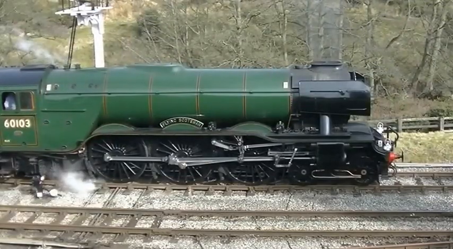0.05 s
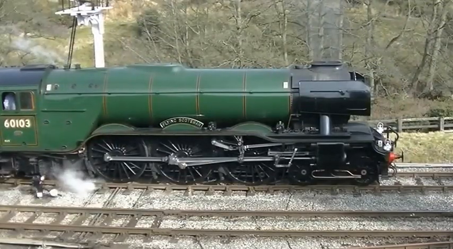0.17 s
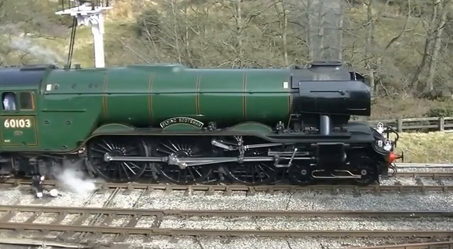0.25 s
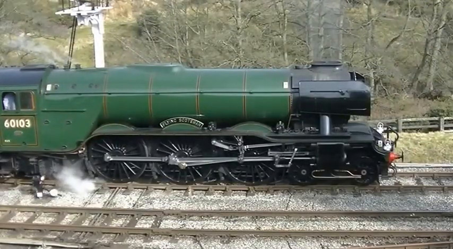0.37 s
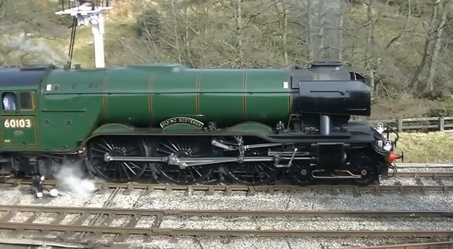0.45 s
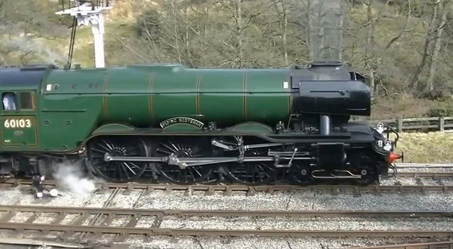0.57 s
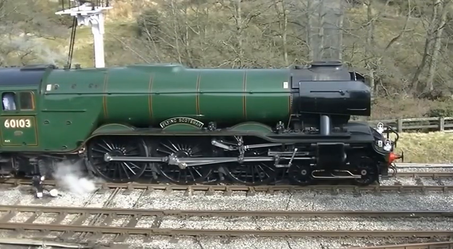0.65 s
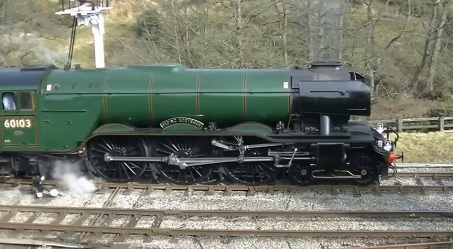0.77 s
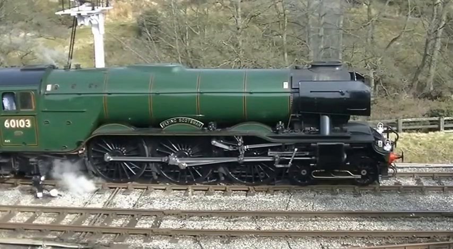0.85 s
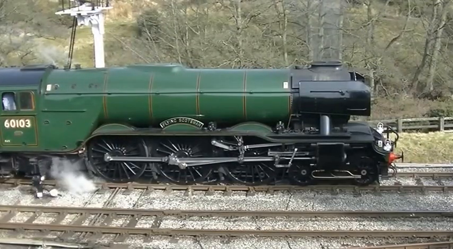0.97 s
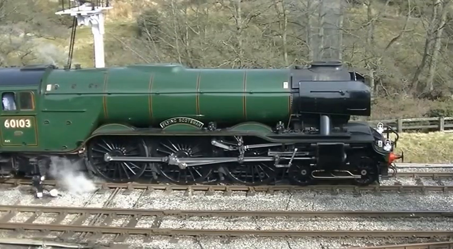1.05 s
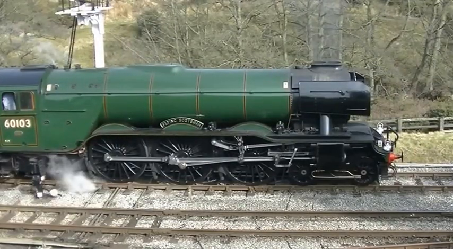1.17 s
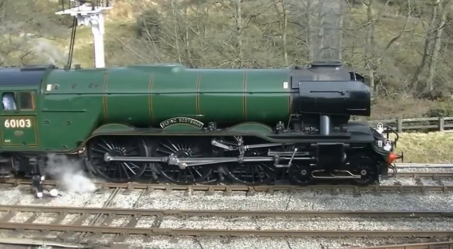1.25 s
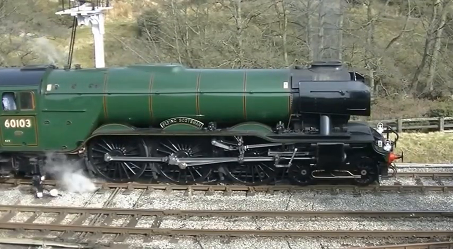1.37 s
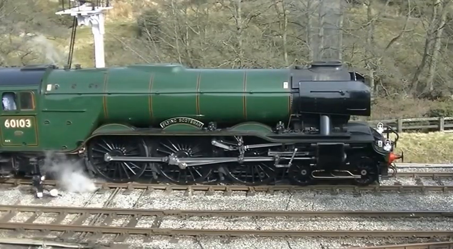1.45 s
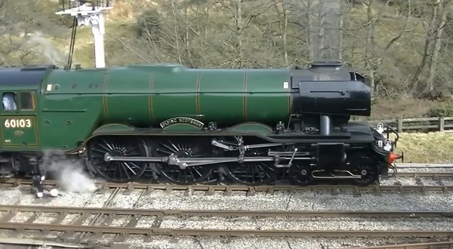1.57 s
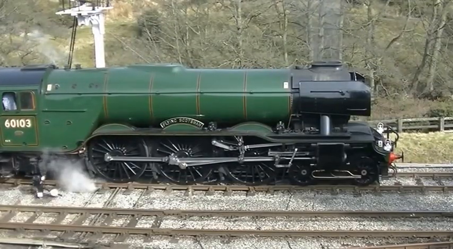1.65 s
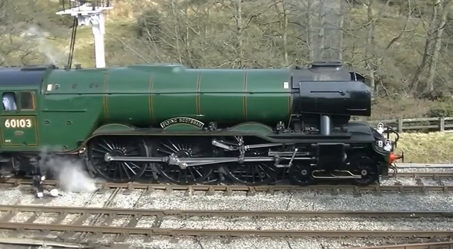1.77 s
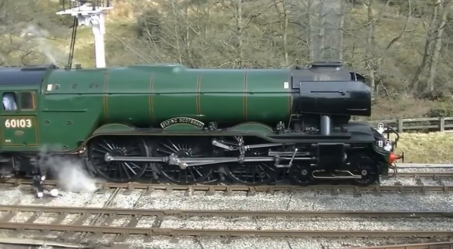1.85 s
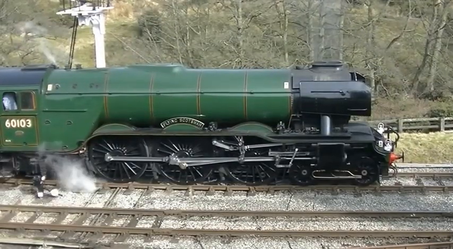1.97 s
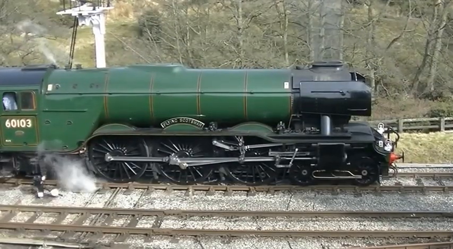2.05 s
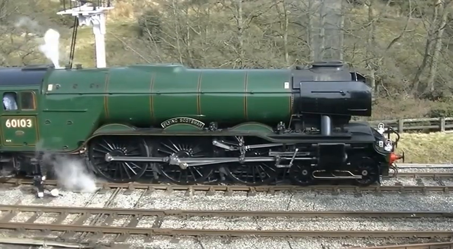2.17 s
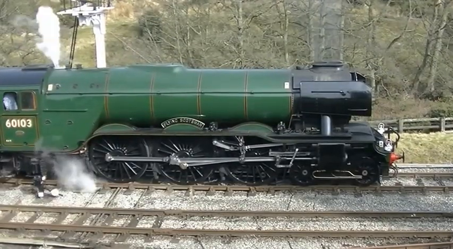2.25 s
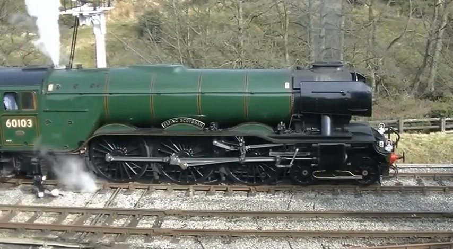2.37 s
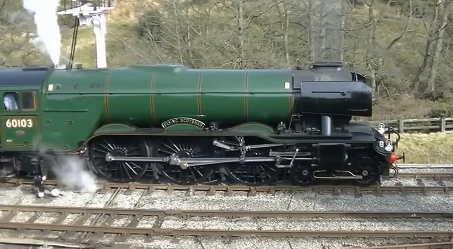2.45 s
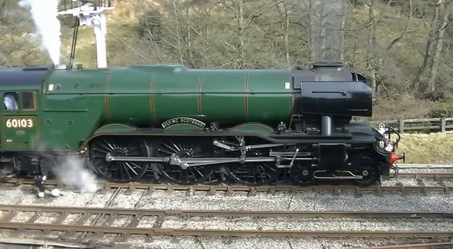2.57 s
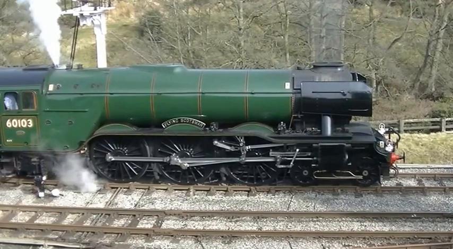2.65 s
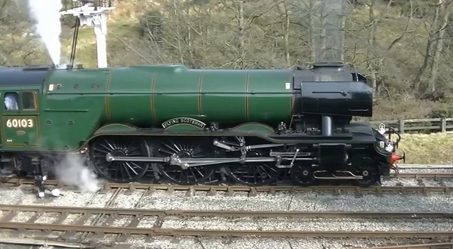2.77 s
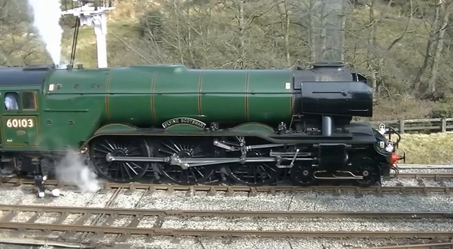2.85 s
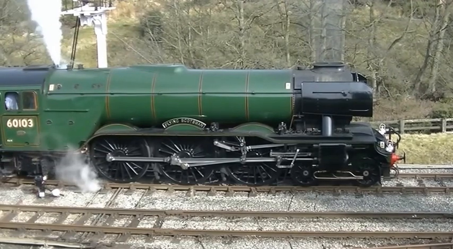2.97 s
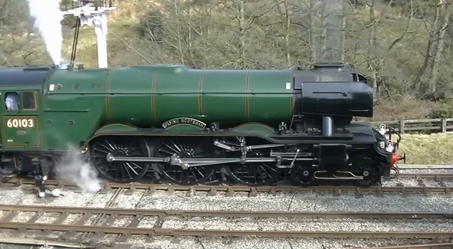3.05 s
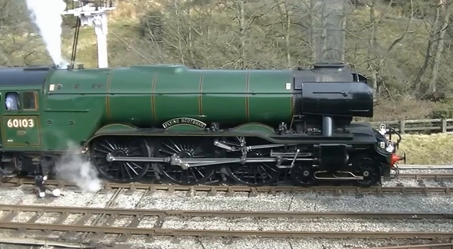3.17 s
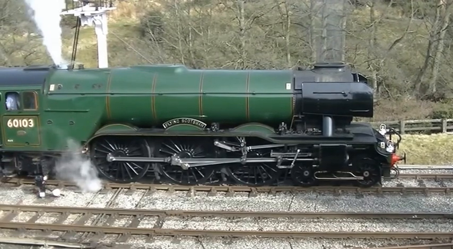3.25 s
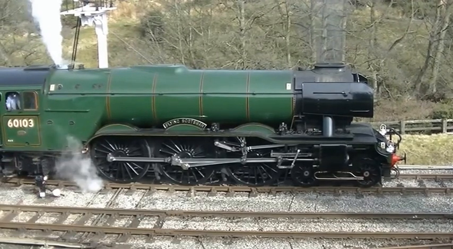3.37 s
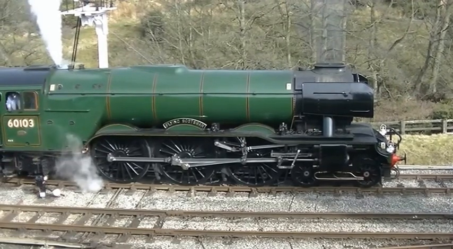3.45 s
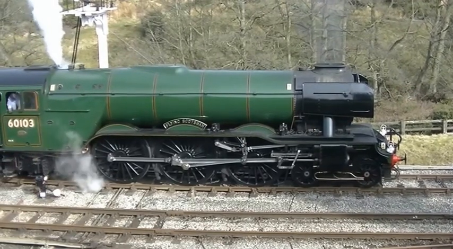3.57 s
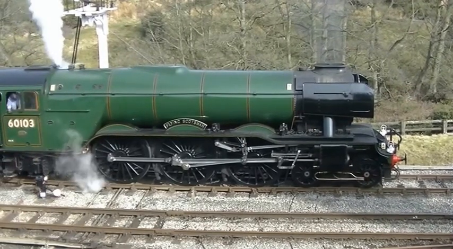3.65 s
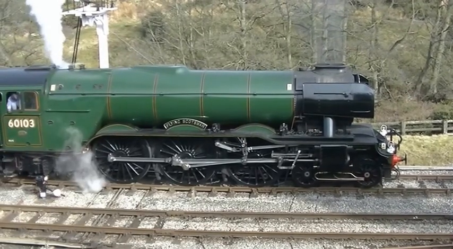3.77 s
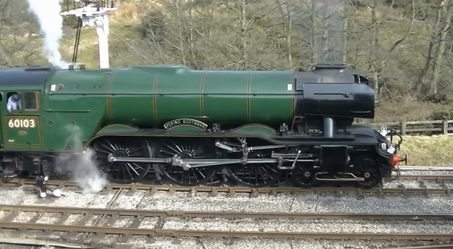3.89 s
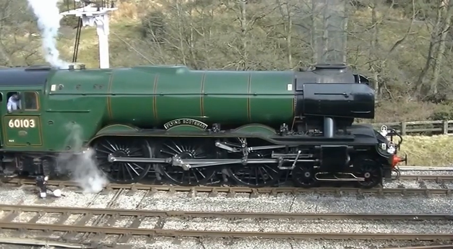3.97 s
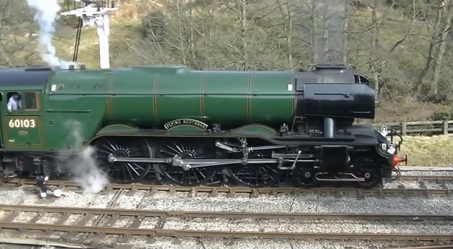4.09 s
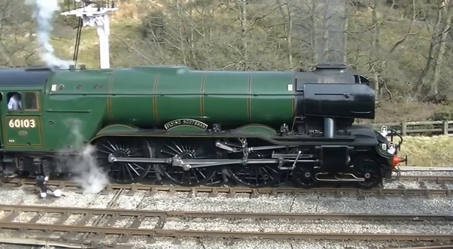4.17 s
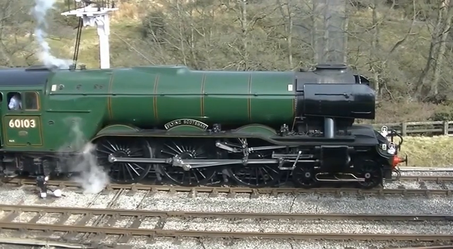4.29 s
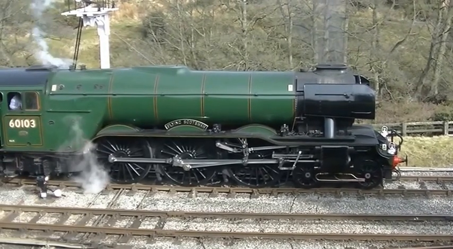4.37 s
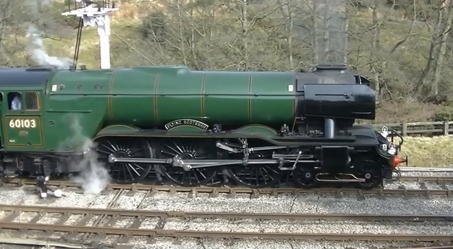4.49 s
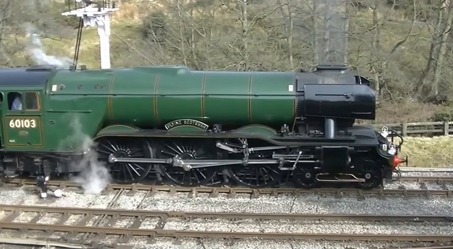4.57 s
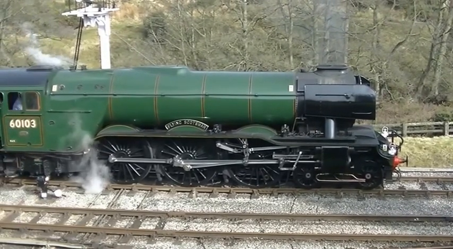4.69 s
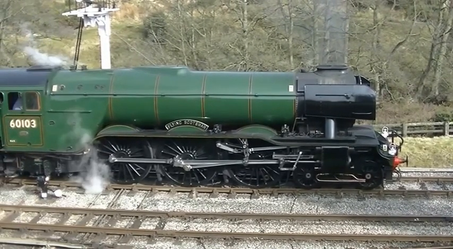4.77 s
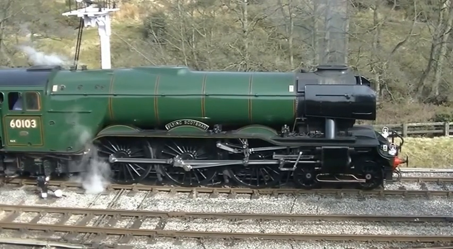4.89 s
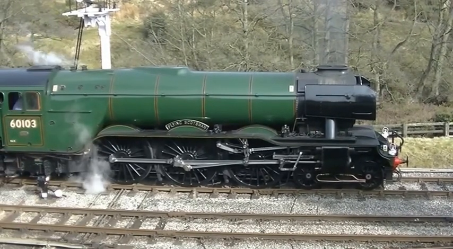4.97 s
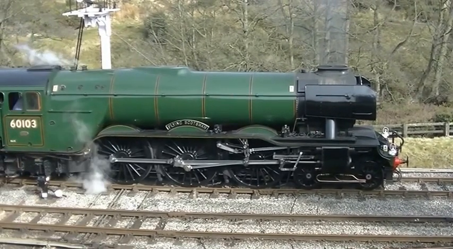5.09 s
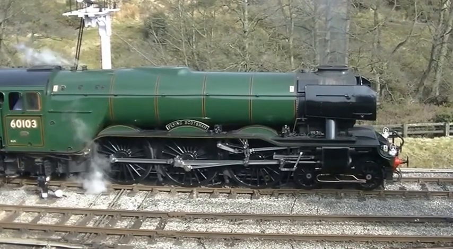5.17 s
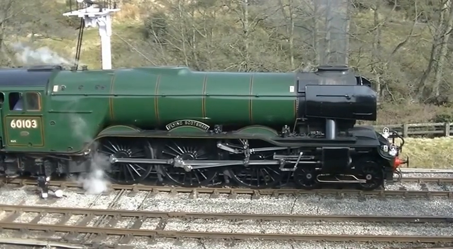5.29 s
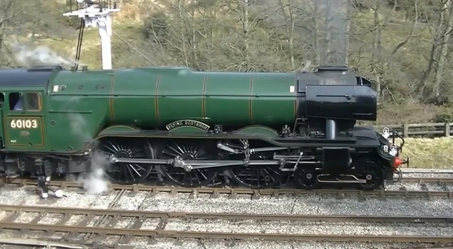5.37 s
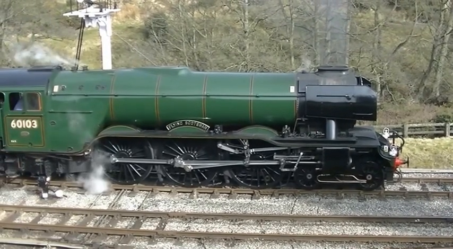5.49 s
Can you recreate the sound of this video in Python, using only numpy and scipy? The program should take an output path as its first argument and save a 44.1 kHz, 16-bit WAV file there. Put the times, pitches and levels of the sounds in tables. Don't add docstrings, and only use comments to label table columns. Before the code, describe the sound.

Outdoors beside a railway, continuous escaping steam with a slightly pipe-like, wavering colour. Midway, a very high single whistle note breaks in with a wet stutter, slides up to pitch and holds, trembling slightly, with breathy steam around it. It ends abruptly; a dull smear and three weak echoes follow while the hiss swells back. A faint bright steam puff comes later. Camera microphone, stereo, automatic level.

```python
import sys
import numpy as np
from scipy import signal
from scipy.fft import rfft, irfft
from scipy.io import wavfile
from scipy.ndimage import uniform_filter1d

SR = 44100
rng = np.random.default_rng(int(sys.argv[2]) if len(sys.argv) > 2 else 0)


def natural_amplitude(level_db):
    exponent = np.asarray(level_db, float) / 20
    return 10 ** exponent


def to_wav(sig):
    pcm = np.clip(np.atleast_2d(sig), -1, 1) * 32767
    pcm = np.round(pcm).astype(np.int16)
    wavfile.write(sys.argv[1], SR, pcm.T)


N = 243873
LONG = 2 ** 18

# (time [s], tone level [dB], left over right [dB])
NOTE = [
    (2.345, -37, 2),
    (2.365, -22, -2),
    (2.42, -13.5, -9.5),
    (2.47, -9.5, 5),
    (2.62, -8.5, -3),
    (2.8, -7, 1.5),
    (3.3, -8.5, 2),
    (3.89, -12, 0),
    (3.931, -15.5, 2),
]


def whistle():
    # (multiple of the note, level under the tone [dB], left over right [dB], extra level while cold [dB])
    overtones = [
        (2, -29.5, 14.5, -3),
        (3, -29.5, -5, -19),
        (5, -53, 0, -7),
    ]
    leads_rad, flickers_db = (4.3, 0, .6), (4.5, 2.6, 2.5)
    # (time [s], level [dB], half width [s])
    falters = [
        (2.352, -7.5, .006),
        (2.365, -20, 0.00094),
        (2.401, -7.5, 0.0035),
        (2.44, -4, 0.0054),
        (2.463, -8, 0.0036),
        (3.871, -7.5, 0.0032),
        (3.878, -10, 0.0026),
        (3.917, -10, 0.004),
    ]
    warm_hz, cold_hz, warm_s = 3041.6, 134.2, .45
    catch_hz, catch_s = 190, .025
    shut_s, shut_sag_hz = .012, 170
    bloom_s = .2

    t = np.arange(N) / SR
    start, end = NOTE[0][0], NOTE[-1][0]
    since = np.maximum(t - start, 0)
    shut = np.clip((t - end) / shut_s, 0, 1)
    on = np.clip(np.minimum(since, end + shut_s - t) / 0.0065, 0, 1)
    falter_db = sum(db * np.exp(-((t - s) / w) ** 2) for s, db, w in falters)

    hz = warm_hz - cold_hz * np.exp(-since / warm_s)
    hz = hz - catch_hz * np.exp(-since / catch_s) - shut_sag_hz * shut
    hz = hz + 7.6 * drift(0.0044) + 2.61 * drift(0.0207)
    turn = 2 * np.pi * np.cumsum(hz) / SR

    side = np.array([[.5], [-.5]])
    tone_db = steam_db() + curve(NOTE, column=2) * side + 0.52 * drift(0.0057)
    tone = np.cos(turn - 0.19 * side) * natural_amplitude(tone_db)
    for (multiple, db, left_db, cold_db), lead, flicker_db in zip(overtones, leads_rad, flickers_db):
        level_db = steam_db() + db + cold_db * np.exp(-since / bloom_s)
        level_db = level_db + left_db * side + flicker_db * drift(0.016)
        tone = tone + np.cos(round(multiple) * turn + lead * side) * natural_amplitude(level_db)
    return np.sqrt(2) * on * natural_amplitude(falter_db) * tone


def steam_db():
    shut_db_per_s = 900
    t = np.arange(N) / SR
    outside = np.maximum(np.maximum(NOTE[0][0] - t, t - NOTE[-1][0]), 0)
    return np.maximum(curve(NOTE, column=1) - shut_db_per_s * outside, -120)


def valve(hz):
    # (frequency [Hz], level [dB])
    jet_colour = [(300, -44), (1000, -16), (3000, -6.5), (6000, -6), (9000, 0.5), (10500, -8.5),
                  (11500, -14.5), (13000, -13.5), (15700, -20)]
    # (frequency [Hz], width [Hz], level [dB])
    bell = [(646, 250, -43), (1148, 178, -30), (1940, 160, -41), (2720, 150, -27.5), (3063, 304, -22.5),
            (3880, 570, -34), (4970, 240, -30), (6210, 560, -37), (7050, 250, -48), (7860, 92, -37.5),
            (8760, 570, -43.5), (9870, 900, -45)]
    # (frequency [Hz], likeness [0-1], left over right [dB], phase the left leads by [rad])
    high_place = [(400, 0.97, -1, 0.5), (2500, .998, 1, 0), (3000, 1, 2, 1.5), (3600, 0.83, -1, -0.5),
                  (5230, 0.95, 1, 1), (5670, 0.67, 1.5, 4), (6220, 0.68, 5.5, 2), (7240, 0.55, 2.5, -1.5),
                  (7660, 0.97, -1, -0.5), (10300, 0.95, -3, 0.5), (11200, .25, -7, -3), (12000, .6, -2, 1),
                  (14200, .6, 0, -5)]
    breath_db, spill_db = -15.5, -31.5

    jet = turbulence(natural_amplitude(read(jet_colour, hz)), 1.2, 0.92, high_place)
    low_cut = 1 / (1 + (450 / (hz + 1)) ** 4)
    breath = turbulence(low_cut * peaks(bell, hz, steep=1.59), 0.94, 0.43, high_place)
    spill = natural_amplitude(steam_db() + spill_db + 1.2 * drift(.05))
    breath_level = natural_amplitude(steam_db() + breath_db + 0.52 * drift(0.052))
    return (puffs() + spill) * jet + breath_level * breath


def puffs():
    # (start [s], rise [s], peak level [dB], fall [dB per s], settling level [dB])
    puff_times = [
        (2.17, 0.2, -39.5, 300, -90),
        (2.62, .08, -38, 111, -91),
        (3.36, 0.23, -32.5, 130, -90),
        (4.52, 0.16, -41.5, 40, -51),
    ]
    t, level = np.arange(N) / SR, 0
    for start, rise, peak_db, fall_db, rest_db in puff_times:
        swell = np.clip((t - start) / rise, 0, 1) ** 0.94
        sinking_db = peak_db - fall_db * np.maximum(t - start - rise, 0)
        level = level + swell * natural_amplitude(np.maximum(sinking_db, rest_db))
    return level


def leak(hz):
    # (frequency [Hz], level [dB per Hz])
    hiss = [(30, -63), (180, -64.5), (400, -38.5), (600, -24), (900, -28.5), (1100, -11.5), (2000, -12.5),
            (2500, -18.5), (3100, -12), (4500, -8.5), (5800, -12.5), (7300, -25), (11500, -35),
            (15700, -46)]
    # (frequency [Hz], width [Hz], level
    # [dB])
    pipes = [(226.6, 33, -32.5), (310, 33, -39), (373, 39, -31.5), (452.4, 31, -21.5), (514, 67, -18.5),
             (666, 27.5, -6), (728, 44, -10), (775.5, 28, -7), (865, 17, -13), (1008.4, 103, -4.5),
             (1190, 58, -10), (1287, 46, -5), (1429, 83, -5), (1550, 31, -6), (1652, 76, -3),
             (1723, 37, -7.5), (1925, 86, -2.5), (2033, 60, -7.5), (2128, 51, -7), (2343, 150, -12),
             (2718, 83, -5.5), (2855, 90, -0.5),
             (3418, 103, -2.5), (3830, 183, 2), (4147, 54, -1.5), (5030, 44, -27), (4980, 110, -0.5),
               (5288, 156, -1.5), (6333, 54, -10), (6655, 220, -17.5), (7640, 184, -16.5),
               (9370, 230, -27.5), (10340, 880, -32), (12600, 900, -32.5)]
    # (frequency [Hz], likeness [0-1], left over right [dB], phase the left leads by [rad])
    low_place = [(60, .7, 2, 3), (300, 1, -3, 0), (1200, 0.99, -1.3, 0), (2400, 0.96, -2, 0),
                 (3080, 0.93, -4, 0), (3700, 1, -3.5, 0.57), (5560, 0.98, -1, .5), (6130, 0.7, 1.5, 1.93),
                 (6310, 0.9, 8, 0.1), (7550, 0.8, 5, -1.5), (8500, 0.5, 1, -0.5), (10500, .7, -9.5, -1.1),
                 (11400, .2, -4, 3), (12600, .7, 0.5, -3.5), (14000, .25, -2.5, 3.5)]
    colour = np.hypot(natural_amplitude(read(hiss, hz)), peaks(pipes, hz, steep=1.97))
    return natural_amplitude(-28) * turbulence(colour, 1.53, 0.93, low_place)


def hillside(x):
    # (delay [s], level [dB])
    banks = [
        (0.199, -30.5),
        (.31, -29.5),
        (.435, -29),
    ]
    near_s, far_s = .03, .45
    hill_db, fall_db_per_s, beyond_db = -34.5, 25, -7
    delay = np.arange(SR) / SR
    db = hill_db - fall_db_per_s * delay + beyond_db * (delay > far_s)
    onset = np.minimum(delay / near_s, 1) ** 3
    taps = onset * natural_amplitude(db - 31.0) * rng.standard_normal((2, SR))
    for s, echo_db in banks:
        taps[:, round(s * SR)] += natural_amplitude(echo_db)
    taps = signal.lfilter(*signal.butter(1, 5500, fs=SR), taps + 0.32 * taps[::-1])
    return signal.fftconvolve(x, taps, axes=1)[:, :N]


def turbulence(colour, patchy_db, gust_db, place):
    hop, frame = 256, 1024
    frames, hz = N // hop + 6, np.fft.rfftfreq(frame, 1 / SR)
    a, b, c, d, patches, strands = rng.standard_normal((frames, len(hz), 6)).T
    strands = evened(uniform_filter1d(uniform_filter1d(strands, size=5, axis=0), size=24, axis=1))
    patches = evened(uniform_filter1d(uniform_filter1d(patches, size=14, axis=0), size=10, axis=1))
    gusts = evened(uniform_filter1d(rng.standard_normal(frames), size=5))

    same, lean_db, lead = (read(place, hz, column=k)[:, None] for k in (1, 2, 3))
    same = np.clip(same, 0, 1)
    left = a + 1j * b
    right = (same * left + np.sqrt(1 - same ** 2) * (c + 1j * d)) * np.exp(-1j * lead)
    ports = np.array([left * natural_amplitude(lean_db / 2), right * natural_amplitude(-lean_db / 2)])
    ports = ports * natural_amplitude(patchy_db * (patches + 0.68 * strands) + gust_db * gusts)
    white = signal.istft(ports, nperseg=frame, noverlap=frame - hop)[1][:, :N]
    return evened(irfft(rfft(white, LONG) * colour, LONG)[:, :N])


def peaks(modes, hz, steep):
    return np.sqrt(sum(natural_amplitude(2 * db) / (1 + (2 * (hz - f) / w) ** 2) ** steep for f, w, db in modes))


def drift(seconds):
    size = max(round(seconds * SR), 1)
    return evened(uniform_filter1d(uniform_filter1d(rng.standard_normal(N), size), size))


def evened(x):
    return x / np.sqrt(np.mean(abs(x) ** 2) + 1e-20)


def read(points, hz, column=1):
    points = np.array(points)
    return np.interp(np.log(hz + 1), np.log(points[:, 0] + 1), points[:, column])


def curve(rows, column):
    rows = np.array(rows)
    return np.interp(np.arange(N) / SR, rows[:, 0], rows[:, column])


def gain_control(x):
    knee_db, squeeze, memory = -26, 0.78, 0.54
    grab_s, let_go_s, memory_s = 0.0023, .09, 5.4
    step = 64
    power = abs(uniform_filter1d((x ** 2).mean(0), size=441)[::step])
    over_db = squeeze * np.maximum(10 * np.log10(power + 1e-12) - knee_db, 0)
    grab, let_go, forget = 1 - np.exp(-step / SR / np.array([grab_s, let_go_s, memory_s]))
    cut_db, now = np.zeros(len(over_db)), 0.
    for i, want in enumerate(over_db):
        now += (want - now) * (grab if want > now else let_go)
        cut_db[i] = now
    cut_db = cut_db + memory * signal.lfilter([forget], [1, forget - 1], cut_db)
    return x * natural_amplitude(-np.interp(np.arange(N), np.arange(len(cut_db)) * step, cut_db))


def scene():
    hz = np.fft.rfftfreq(LONG, 1 / SR)
    blast = whistle() + valve(hz)
    return leak(hz) + blast + hillside(blast)


def low_pass(x):
    return signal.sosfilt(signal.butter(12, 16200, fs=SR, output="sos"), x)


def record(dry):
    port_mix = np.array([[1, .45], [.45, 1]])
    preamp = natural_amplitude(-68) * port_mix @ rng.standard_normal(dry.shape)
    x = gain_control(dry) + preamp
    band_limit = signal.firwin(1023, 15750, window=("kaiser", 9), fs=SR)  # low-pass, Hz
    x = signal.oaconvolve(x, band_limit[None], "same")
    return low_pass(x)


dry = scene()
out = record(dry)
to_wav(out)
```